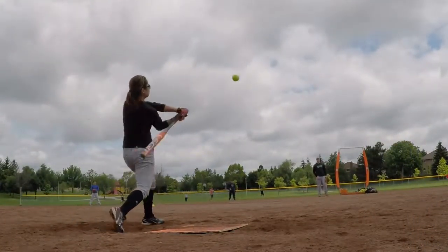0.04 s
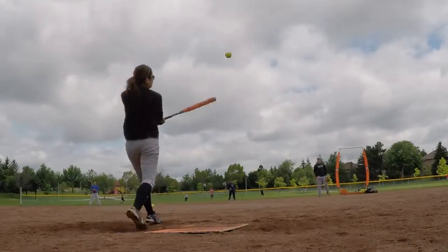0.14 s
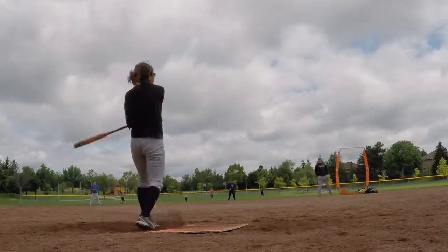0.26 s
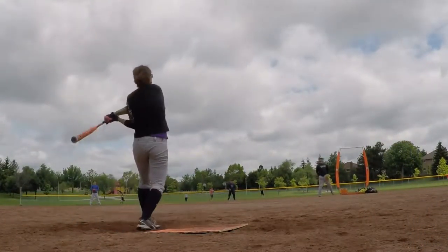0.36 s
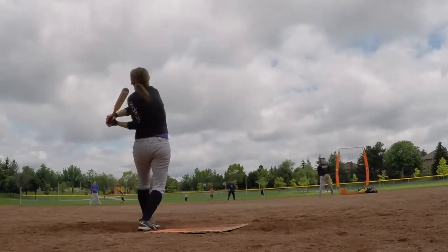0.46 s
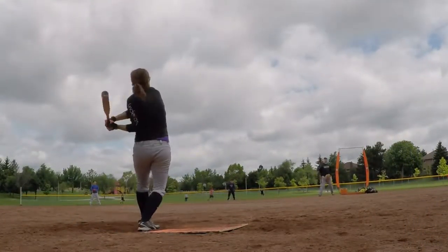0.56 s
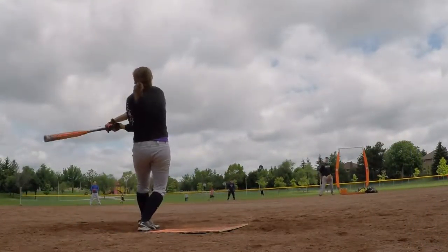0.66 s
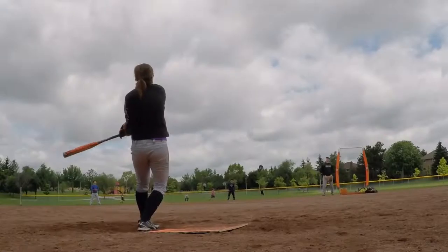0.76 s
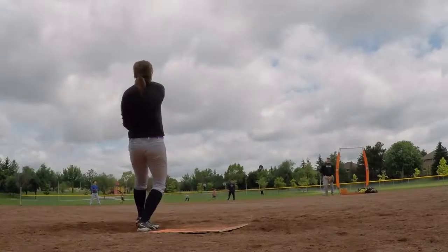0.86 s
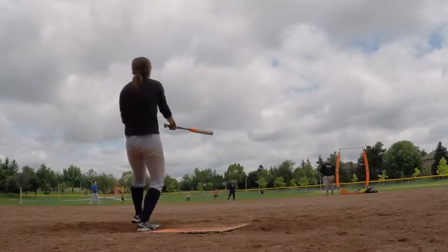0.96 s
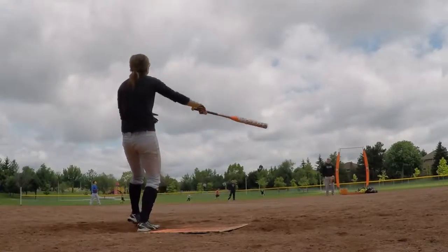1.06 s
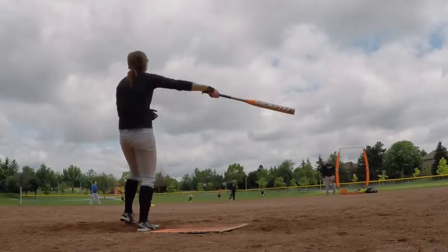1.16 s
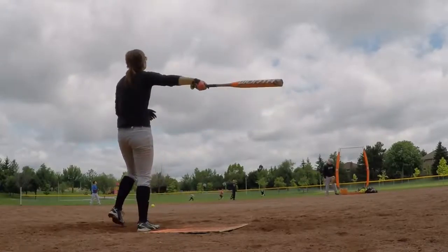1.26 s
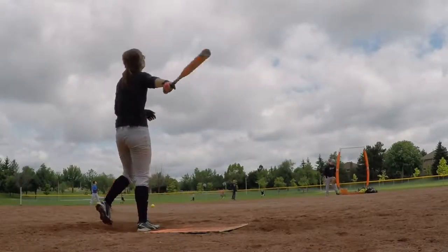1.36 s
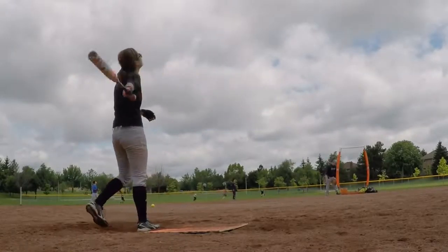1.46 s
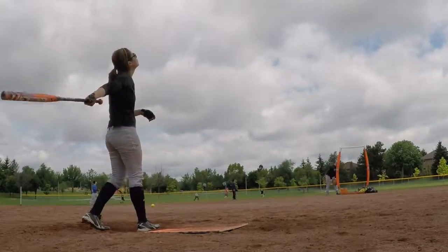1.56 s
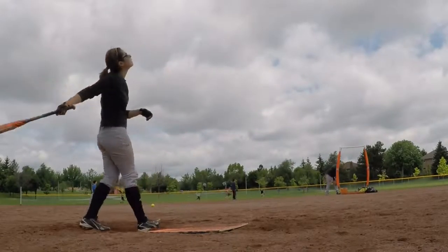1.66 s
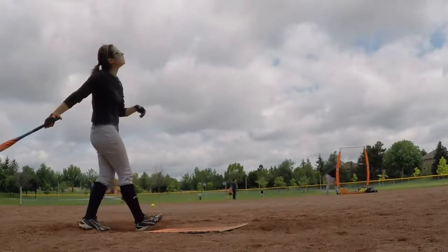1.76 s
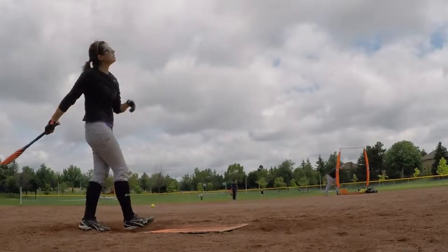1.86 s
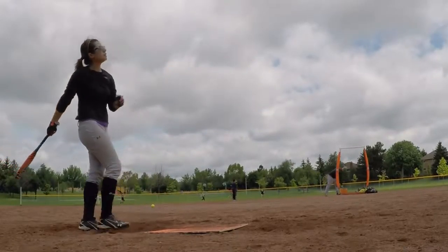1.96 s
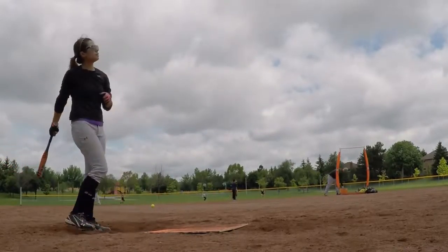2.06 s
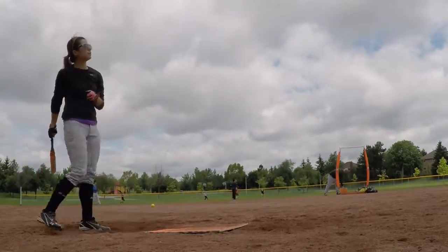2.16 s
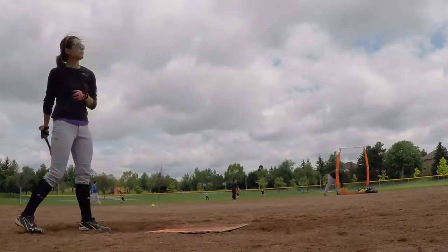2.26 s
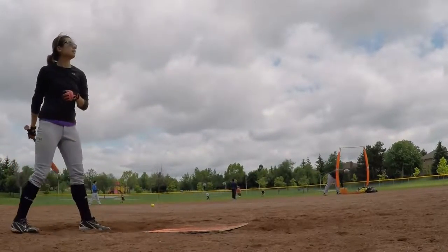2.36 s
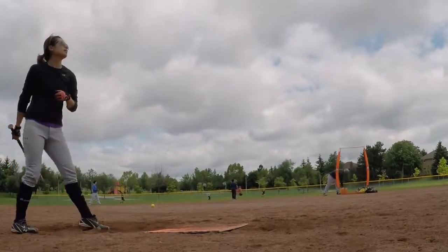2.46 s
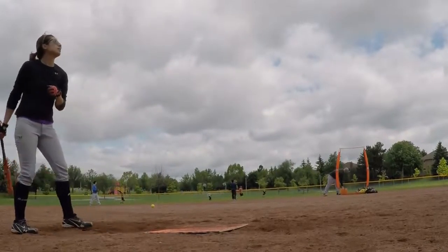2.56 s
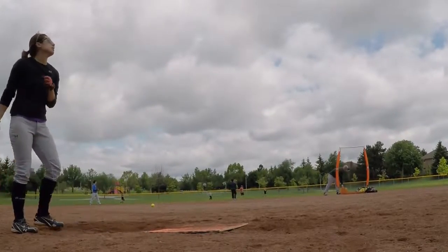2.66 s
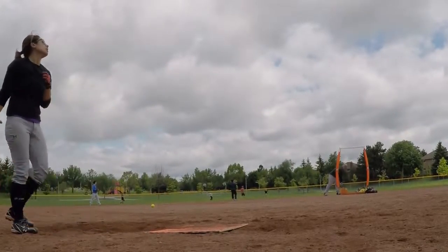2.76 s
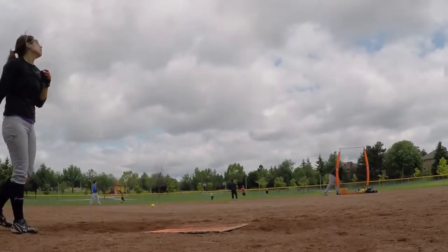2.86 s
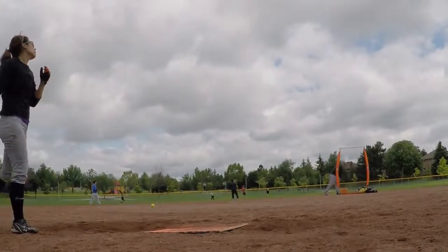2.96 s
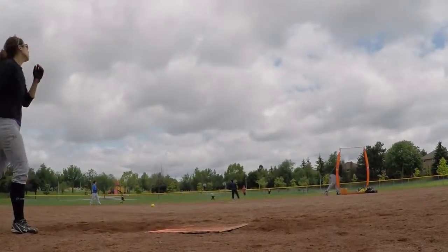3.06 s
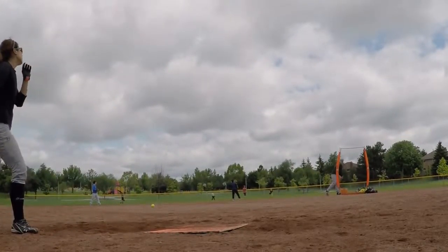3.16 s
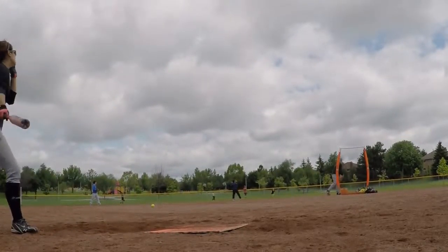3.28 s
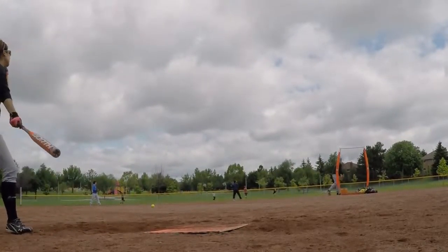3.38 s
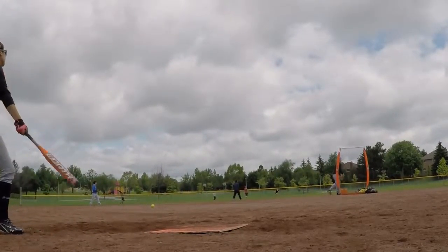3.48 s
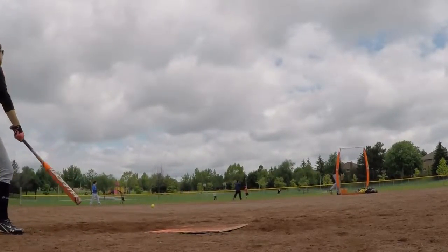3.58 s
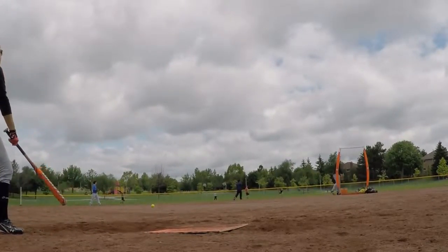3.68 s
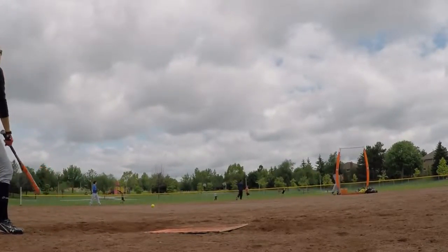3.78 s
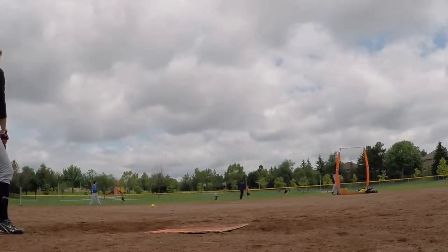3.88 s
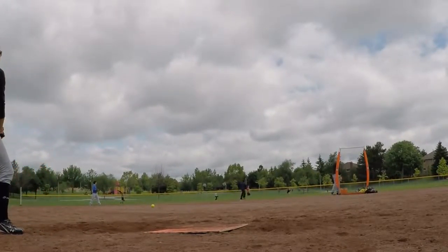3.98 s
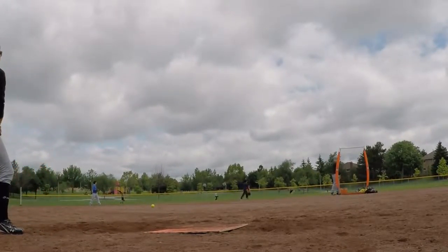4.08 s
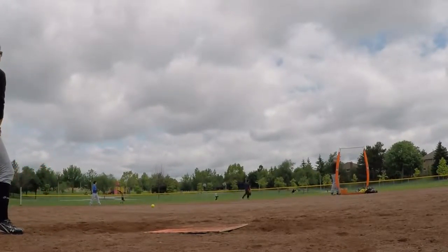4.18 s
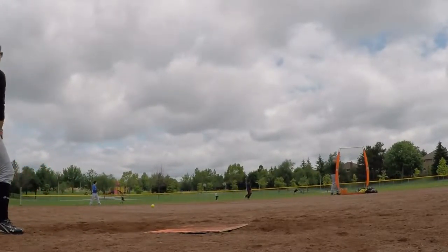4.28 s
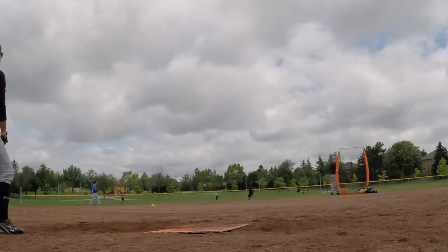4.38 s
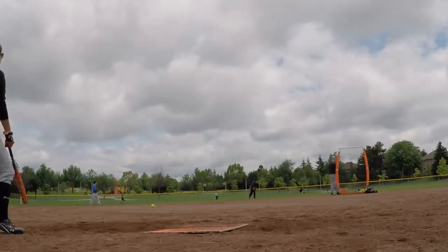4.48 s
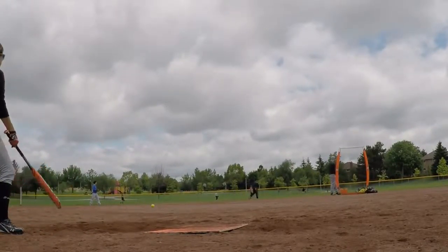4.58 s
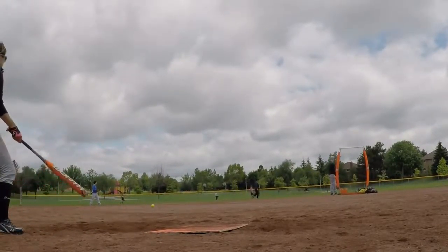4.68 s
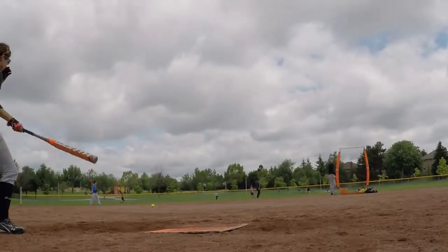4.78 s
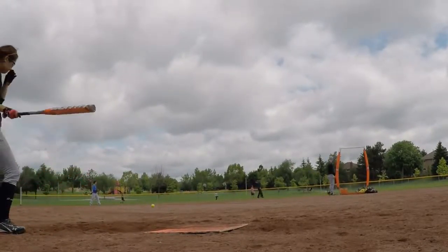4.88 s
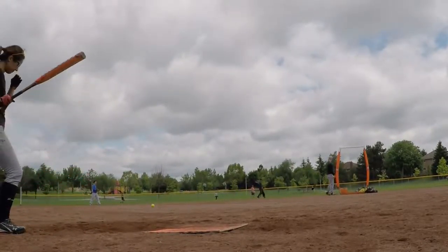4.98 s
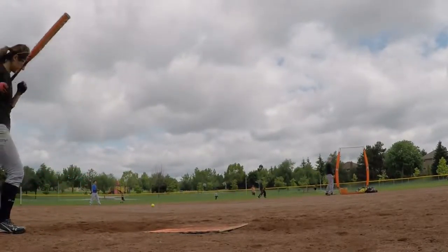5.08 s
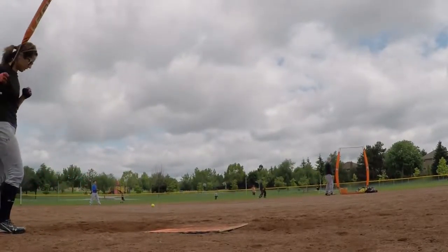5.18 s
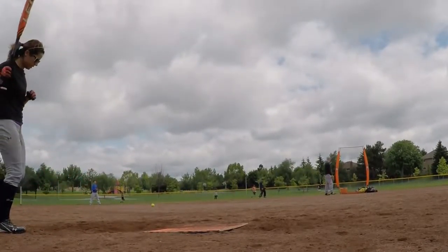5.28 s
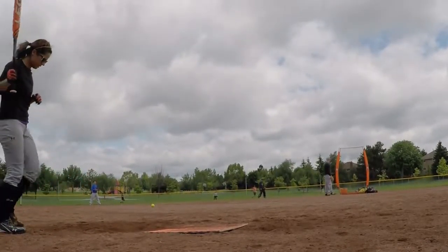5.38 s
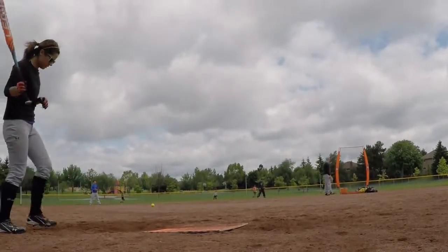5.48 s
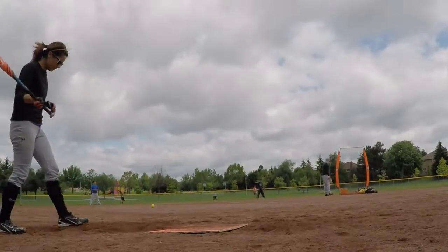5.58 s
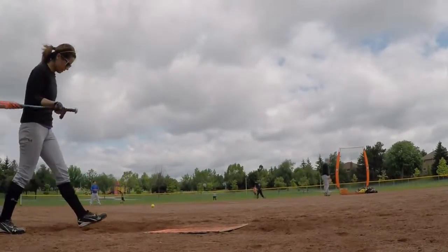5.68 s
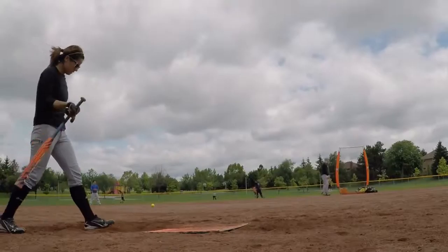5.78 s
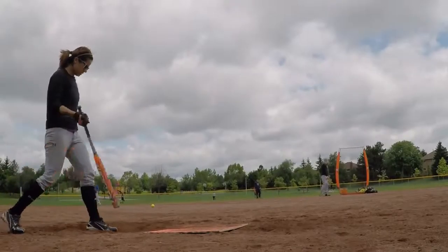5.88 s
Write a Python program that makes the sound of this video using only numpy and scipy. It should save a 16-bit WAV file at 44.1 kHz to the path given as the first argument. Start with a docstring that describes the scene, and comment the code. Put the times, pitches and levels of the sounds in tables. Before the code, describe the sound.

A hollow bat cracks a softball once on an open field, followed by low wind rumble and irregular soft bumps.

```python
"""An open field, heard through the microphone of a small camera. A hollow bat cracks a softball: the
barrel rings as it swings past, and the ground, a fence and far trees throw back a faint echo.
Wind rumbles, and low bumps come irregularly; shoes and gear scuff, and thin chirps come from far off.
The camera's own electronics leak in over a steady floor of traffic, air and preamp: a low thump ten
times a second, faint ticks and a throbbing hiss high in the treble."""
import sys
import numpy as np
from scipy import signal
from scipy.fft import rfft, irfft
from scipy.io import wavfile

SR = 44100
rng = np.random.default_rng(int(sys.argv[2]) if len(sys.argv) > 2 else 0)


def generate_wav(sig):
    """Save sig (samples, or channels by samples) to the path in sys.argv[1] as 16-bit PCM at SR."""
    pcm = np.round(np.clip(np.atleast_2d(sig).T, -1, 1) * 32767).astype(np.int16)
    wavfile.write(sys.argv[1], SR, pcm)


N = 261954
TIME = np.arange(N) / SR


def from_db(db):
    """Decibels to gain."""
    return 10 ** (np.asarray(db) / 20)


def rms_one(x):
    """Scale to rms 1."""
    return x / np.sqrt(np.mean(x ** 2) + 1e-30)


def butter(x, hz, kind, order=2):
    """Butterworth filter."""
    return signal.sosfilt(signal.butter(order, hz, kind, fs=SR, output="sos"), x)


def band_noise(hz, width_hz):
    """Noise in one band, rms 1."""
    return rms_one(butter(rng.standard_normal(N), [hz - width_hz / 2, hz + width_hz / 2], "band"))


def clicks_at(times, heights, size=N):
    """A silent track with one click per time."""
    track = np.full(size, 1e-18)
    np.add.at(track, np.round(np.asarray(times) * SR).astype(int), heights)
    return track


def ring(force, hz, t60):
    """A unit click sets a dying sine of height 1 ringing."""
    r, w = from_db(-60 / (t60 * SR)), 2 * np.pi * hz / SR
    return signal.lfilter([0, np.sin(w)], [1, -2 * r * np.cos(w), r * r], force)


def hump(t, length, rise):
    """Envelope with a quick rise and a rounded fall around length seconds."""
    return np.clip(t / rise, 0, 1) * np.exp(-np.clip(t / length, 0, 9) ** 3)


def input_stage(x, coupling_hz=10):
    """The high-passes of the microphone input make every low pulse swing back."""
    x = butter(x, 30.3, "high")
    x = butter(x, coupling_hz, "high", order=1)
    return butter(x, coupling_hz, "high", order=1)


# Spectrum of the quiet field at the microphone: f/Hz, density/(dB per Hz)
FLOOR_SPECTRUM = [(15, -91), (25, -71.5), (55, -77.5), (100, -82.5), (140, -87), (360, -95), (900, -101),
                  (1600, -100), (1950, -103), (2600, -100), (3200, -103), (6000, -108), (10000, -113),
                  (12500, -113), (14500, -114), (15200, -122)]
def floor():
    """Far traffic, air and the preamp blend into steady noise, strongest in the bass."""
    hz = np.maximum(np.fft.rfftfreq(N, 1 / SR), 1)
    knots_hz, knots_db = np.transpose(FLOOR_SPECTRUM)
    density = from_db(np.interp(np.log(hz), np.log(knots_hz), knots_db)) * (hz > 8)
    return irfft(rfft(rng.standard_normal(N)) * density * np.sqrt(SR / 2), N)


# The gust, right on the microphone: t/s, rms level/dB
GUST = [(0.0, -55), (0.51, -54), (1.4, -56.5), (1.74, -53), (2.13, -52), (3.46, -47.5), (4.37, -58),
        (5.28, -54), (5.94, -53.5)]
def wind():
    """Turbulence at the microphone rumbles, its level following the gust."""
    rumble = butter(butter(rng.standard_normal(N), 22, "high"), 65.6, "low")
    return from_db(np.interp(TIME, *np.transpose(GUST))) * rms_one(rumble)


def throb(every_s=1001 / 60000, dropout_s=.01433):
    """Inside the camera, a narrow hiss swells through each cycle and drops out at its end."""
    phase = (TIME - dropout_s) / every_s % 1
    swell = np.clip(phase / .6, 0, 1)
    return from_db(-76.5) * swell * band_noise(14200, width_hz=600)


# Treble bands leaking from the camera's electronics: f/Hz, width/Hz, relative level/dB
TICK_BANDS = [(7230, 1550, -2.5), (12660, 1400, -1)]
def ticks(tick_every_s=.02, burst_every_s=.26666, spread_db=4):
    """Inside the camera, clocked ticks of uneven strength and slower, longer bursts gate a hiss."""
    since = TIME - .0031
    strengths = from_db(-63.5 + spread_db * rng.uniform(-2, 1, int(N / SR / tick_every_s) + 2))
    which = (since // tick_every_s).astype(int) + 1
    tick = strengths[which] * hump(since % tick_every_s, length=.0016, rise=.0008)
    burst = from_db(-68) * hump((TIME - .1357) % burst_every_s, length=.012, rise=.0022)
    hiss = sum(from_db(db) * band_noise(hz, width_hz) for hz, width_hz, db in TICK_BANDS)
    return (tick + burst) * hiss


def thumps(every_s=.10241, blip_lead_s=.00193):
    """A clocked current pulse in the camera, rounded by three poles, with a small blip just ahead."""
    starts = np.arange(.01446, N / SR, every_s)
    pulse = clicks_at(starts, -1)
    for pole_hz in (23.6, 212, 396):
        pulse = butter(pulse, pole_hz, "low", order=1)
    pulse = input_stage(pulse)
    blip = butter(clicks_at(starts - blip_lead_s, -1), 654, "low")
    blip = butter(blip, 150, "high", order=1)
    return from_db(-36.5) * pulse / np.max(-pulse) + from_db(-51) * blip / np.max(-blip)


# Short rings of the first crack, ball on bat: f/Hz, relative level/dB, t60/s
CRACK_MODES = [(483, -24, 0.015), (840, -17, 0.015), (1710, -5, 0.017), (2680, -40, .008), (3740, -4, 0.01),
               (5080, -9.5, 0.0051), (7920, -16.5, 0.0042), (9540, -17.5, 0.0067), (12700, -36, 0.0069),
               (14800, -54, .005)]
# Modes of the hollow barrel: f/Hz, relative level/dB, t60/s
BARREL_MODES = [(1136, -19.5, 0.15), (1718, -29, 0.15), (1850, -35, .08), (2267, -15.5, 0.078),
                (2720, -35.5, 0.082), (3004, -29, .07), (3467, -33, .06), (3760, -31, .06),
                (5644, -34, .06), (14750, -62, .08)]
# Barrel modes too dense to tell apart, as dying noise: f/Hz, relative level/dB, t60/s
DENSE_MODES = [(1600, -35.5, 0.05), (1970, -20.5, 0.034), (2560, -33, 0.11), (3600, -25.5, 0.057),
               (4560, -44, 0.078), (5900, -37.5, 0.07), (7900, -41.5, .07), (9400, -39.5, 0.054),
               (12200, -51, .06)]
def bat(contact_s=.1753, build_cycles=3.5):
    """The ball cracks on the bat; the barrel rings as it swings on, and the field answers."""
    size = SR // 2
    t = np.arange(size) / SR
    click = clicks_at([0], 1, size)

    def build(hz):
        """A mode builds over a few of its own cycles, so the treble comes first."""
        return 1 - np.exp(-(t * hz / build_cycles) ** 2)

    def strike(modes):
        """The blow rings the modes with alternating signs."""
        return sum((-1) ** k * from_db(db) * build(hz) * ring(click, hz, t60)
                   for k, (hz, db, t60) in enumerate(modes))

    dense = sum(from_db(db - 60 * t / t60) * build(hz) * band_noise(hz, hz * .24)[:size]
                for hz, db, t60 in DENSE_MODES)
    facing_db = 4 * np.exp(-((t - .022) / .0059) ** 2)   # the barrel turns to face the microphone
    hidden_db = -900 * np.maximum(t - .046, 0)   # then swings away behind the body
    barrel = from_db(3.5 + facing_db + hidden_db) * (strike(BARREL_MODES) + dense)
    direct = butter(barrel + strike(CRACK_MODES), 260, "high")
    # Out toward the field goes less of the ring, plus the ball's flat snap, heard only as echo.
    thrown = from_db(-2) * direct + from_db(6.5) * click
    out, at = np.zeros(N), round(contact_s * SR)
    out[at:at + size] = direct + echoes(thrown)
    return out


# Near to far: the ground, three parts of a fence, trees: delay/s, relative level/dB, smear/s
REFLECTORS = [(.02, -27.5, .04), (.07, -32, 0.0018), (.08, -29, .005), (.088, -28, 0.029),
              (.145, -36, 0.12)]
def echoes(sound):
    """Each reflector scatters the blow back to the microphone along a short burst of random paths."""
    size = len(sound)
    paths = np.zeros(size)
    for delay, db, smear in REFLECTORS:
        late = TIME[:size] - delay
        envelope = np.clip(late / .0025, 0, 1) * np.exp(-np.clip(late, 0, 1) / smear)
        burst = rng.standard_normal(size) * envelope
        paths += from_db(db) * burst / np.sqrt(np.sum(burst ** 2))
    returned = signal.fftconvolve(sound, paths)[:size]
    return butter(butter(returned, 1785, "high", order=1), 6400, "low", order=3)


def weak_bumps(count=16, over_rumble_db=8, spread_db=1.5):
    """Rows (t/s, level/dB) of weak bumps at random moments, set a little above the rumble."""
    when, strength = rng.random((count, 2)).T
    times = when * (N - 1) / SR
    rumble_db = np.interp(times, *np.transpose(GUST))
    return np.transpose([times, rumble_db + over_rumble_db + spread_db * (2 * strength - 1)])


# The strong low bumps: t/s, level/dB
STRONG_BUMPS = [(1.736, -38.5), (1.887, -33), (2.003, -35), (2.291, -31), (2.48, -28.5), (2.554, -37.5),
                (2.61, -27.5), (2.79, -28.5), (2.943, -28), (3.08, -28.5), (3.184, -28), (3.437, -31),
                (3.524, -37.5), (3.627, -35), (4.139, -39.5), (4.946, -36), (5.189, -38.5), (5.399, -31.5),
                (5.617, -34), (5.747, -31.5), (5.915, -35)]
# What every bump rings with: f/Hz, relative level/dB, t60/s
BUMP_MODES = [(28.3, 3.5, 0.14), (57.4, -4, 0.21), (107.5, -11, 0.16), (165, -31, 0.1)]
def low_bumps(spread_db=2.5, rasp_s=.022):
    """Irregular low bumps of one recurring shape, perhaps radio interference in the camera."""
    times, bump_db = np.vstack([STRONG_BUMPS, weak_bumps()]).T
    scatter_db = spread_db * rng.standard_normal((len(times), len(BUMP_MODES)))
    rings = sum(ring(clicks_at(times, -from_db(bump_db + mode_db + own_db)), hz, t60)
                for (hz, mode_db, t60), own_db in zip(BUMP_MODES, scatter_db.T))
    fade = np.exp(-1 / (rasp_s * SR))   # each bump starts with a short rasp
    rasp_envelope = signal.lfilter([1], [1, -fade], clicks_at(times, from_db(bump_db - 36.5)))
    rasp = rasp_envelope * band_noise(1016, width_hz=520)
    return input_stage(butter(rings, 230, "low")) + rasp


# Scuffs, faint at the microphone: t/s, f/Hz, width/Hz, level/dB, length/s
SCUFFS = [(.72, 1190, 600, -65, .02), (1.818, 3170, 900, -68.5, 0.12), (4.135, 1500, 1200, -63, 0.013),
          (5.15, 5530, 900, -60, .008), (5.242, 4570, 1500, -67.5, .04), (5.283, 5300, 803, -66, .005)]
def scuffs():
    """Shoes and gear scrape, each in a brief band of noise."""
    return sum(from_db(db) * hump(TIME - start, length, rise=.0037) * band_noise(hz, width_hz)
               for start, hz, width_hz, db, length in SCUFFS)


# Chirps from far across the field: t/s, f/Hz, rms level/dB, length/s
FAR_CHIRPS = [(2.79, 1855, -70.5, .06), (2.95, 2065, -73, .16), (3.18, 3160, -74, .1)]
def chirps(waver_hz=15):
    """Thin distant tones waver in pitch."""
    waver = waver_hz * rms_one(butter(rng.standard_normal(N), 15, "low"))
    out = np.zeros(N)
    for start, hz, db, length in FAR_CHIRPS:
        tone = np.sqrt(2) * np.sin(2 * np.pi * np.cumsum(hz + waver) / SR)
        out += from_db(db) * hump(TIME - start, length, rise=.015) * tone
    return out


def scene():
    """The field and the camera's own noises, on one microphone."""
    mix = bat() + floor() + wind() + low_bumps() + scuffs() + chirps() + thumps() + ticks() + throb()
    return mix[None, :]


def record(dry, cutoff_hz=15050):
    """The camera cuts the top of the treble steeply."""
    return signal.sosfilt(signal.ellip(10, .5, 70, cutoff_hz, fs=SR, output="sos"), dry)


dry = scene()
out = record(dry)
generate_wav(out)
```